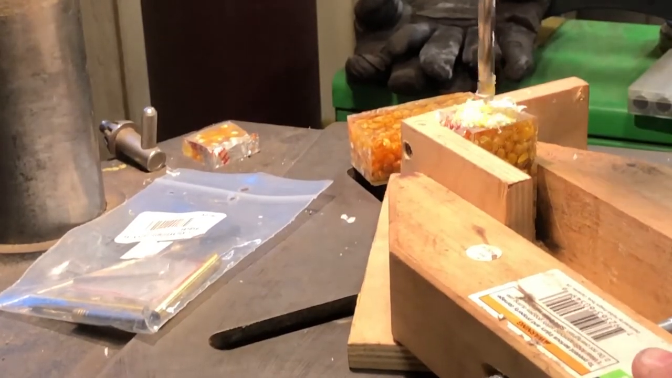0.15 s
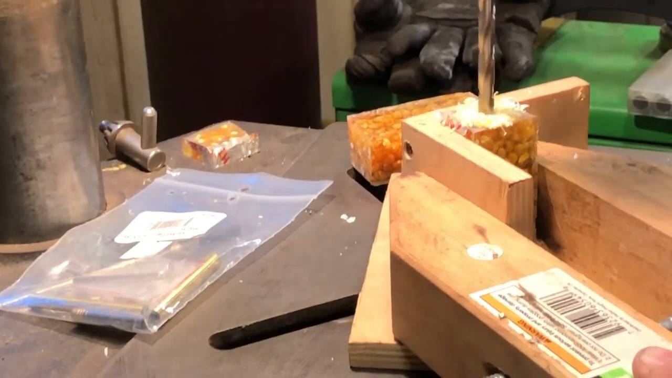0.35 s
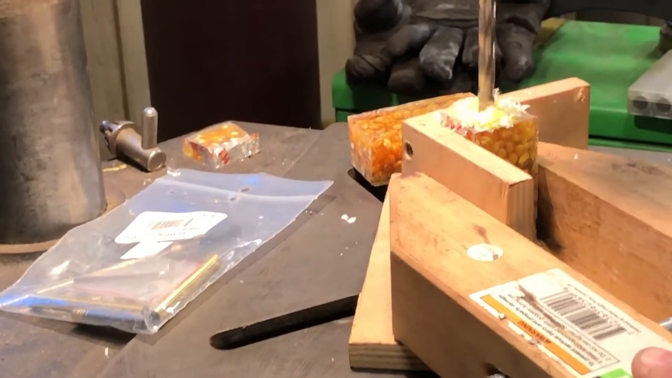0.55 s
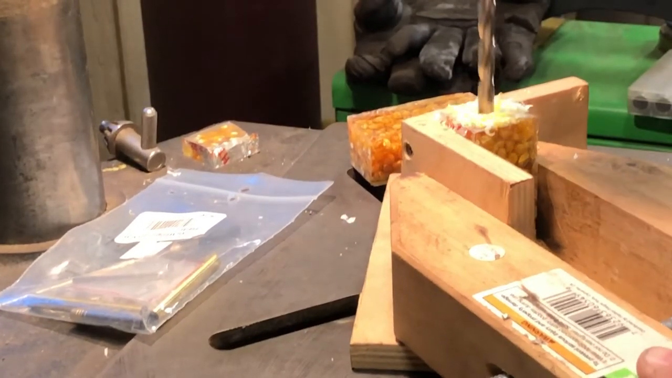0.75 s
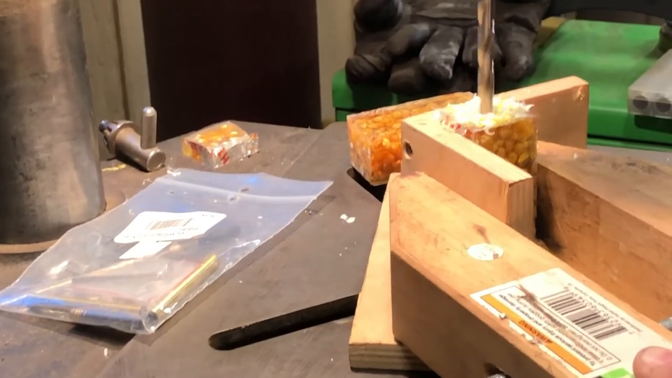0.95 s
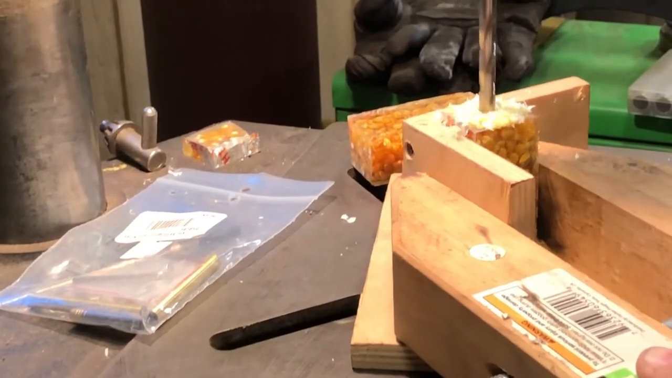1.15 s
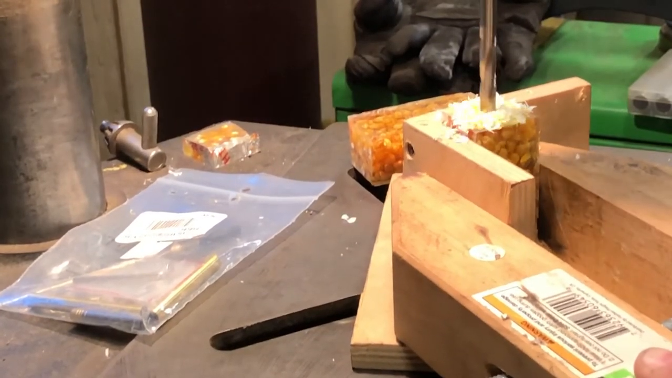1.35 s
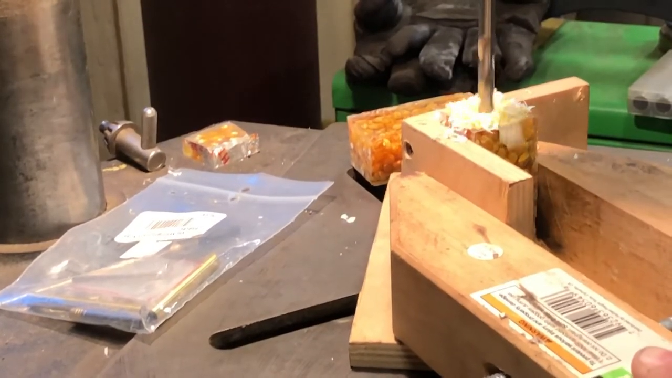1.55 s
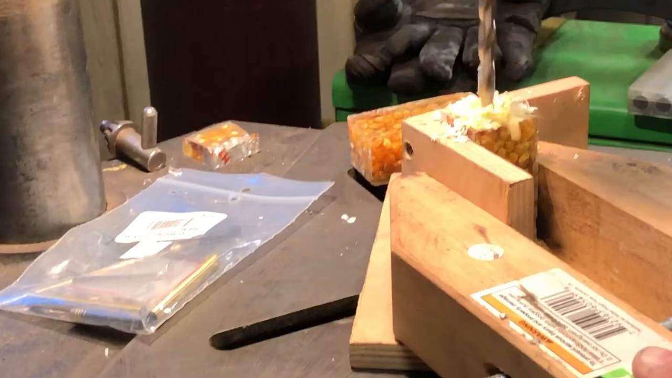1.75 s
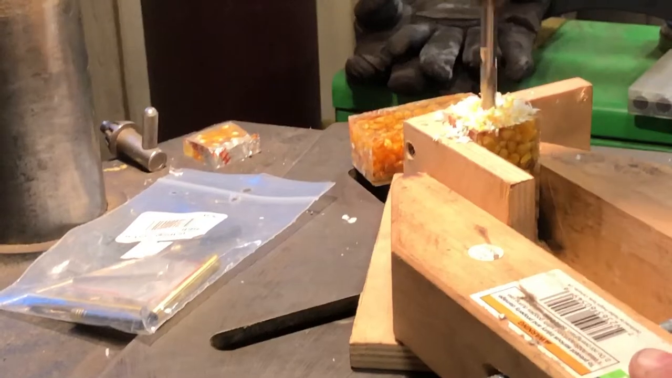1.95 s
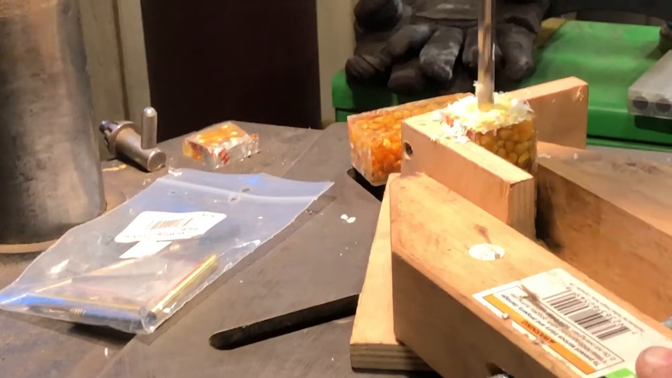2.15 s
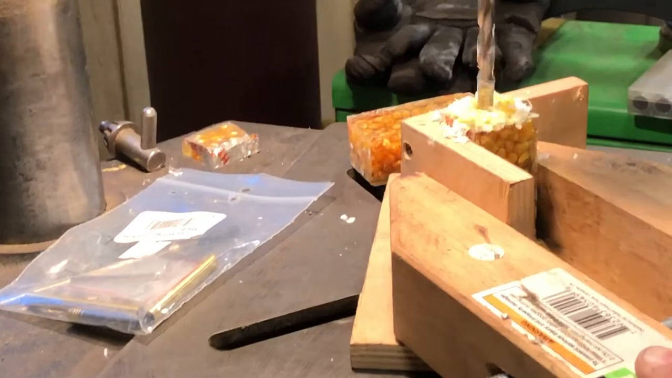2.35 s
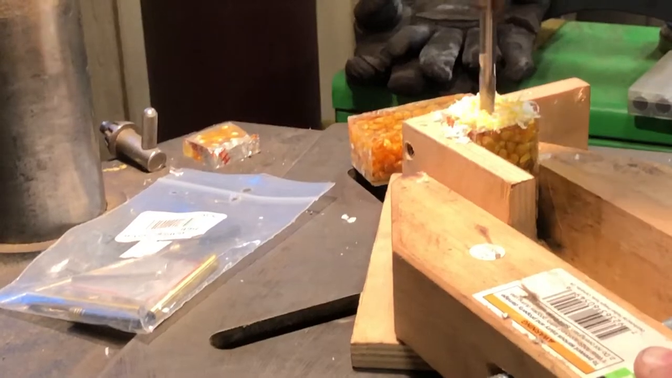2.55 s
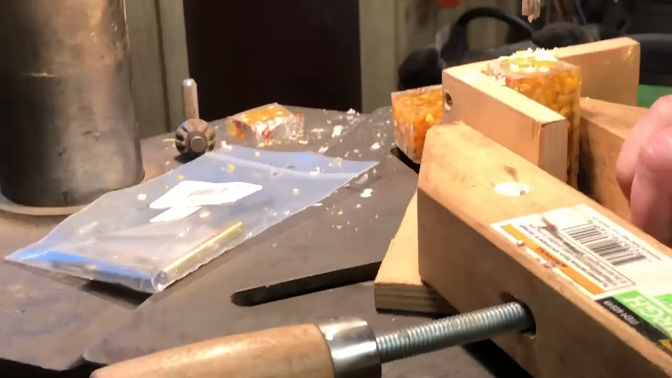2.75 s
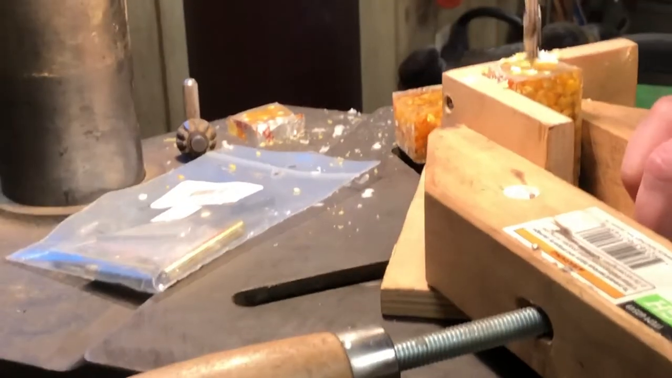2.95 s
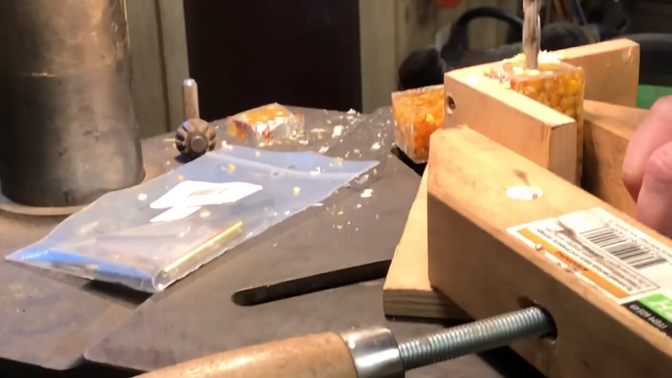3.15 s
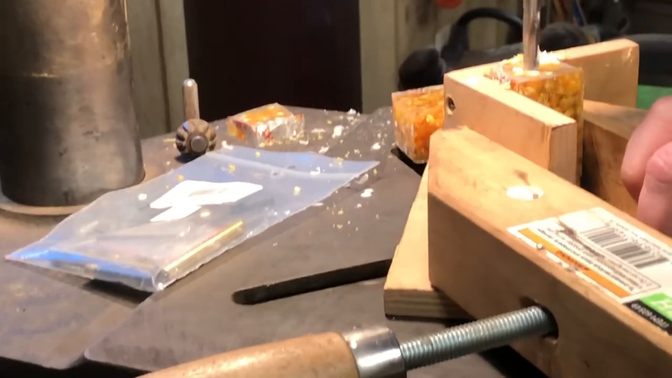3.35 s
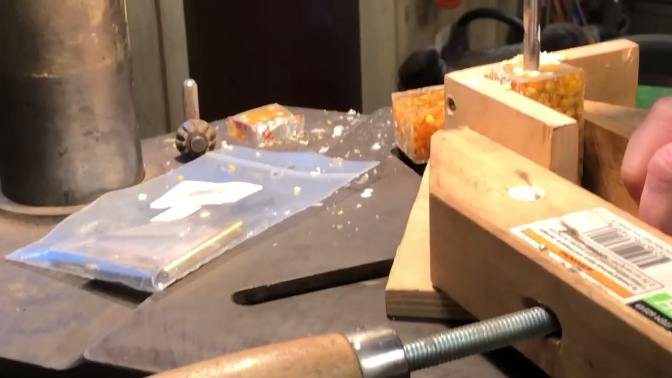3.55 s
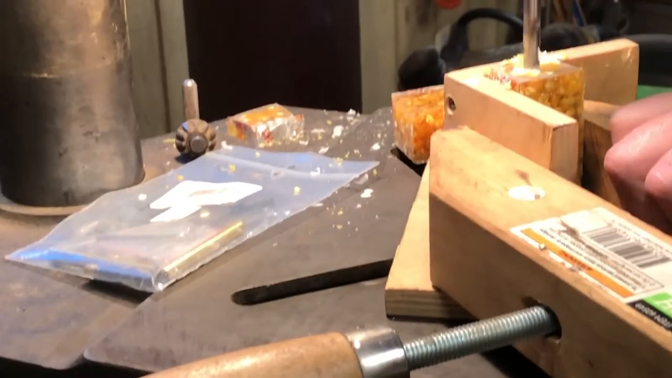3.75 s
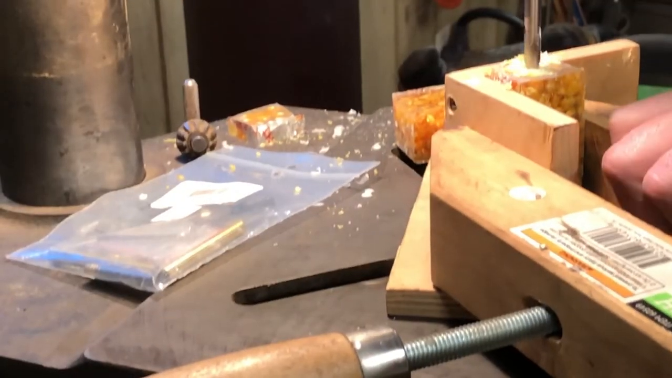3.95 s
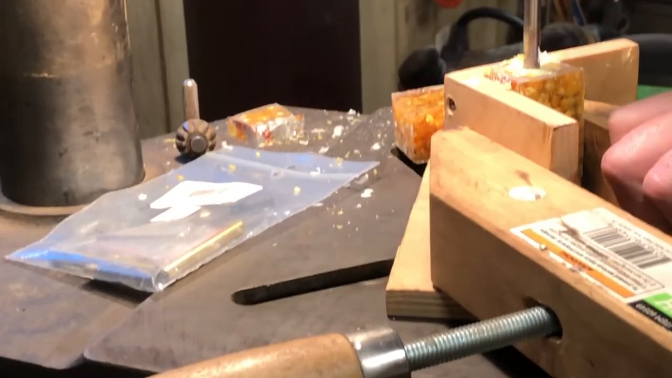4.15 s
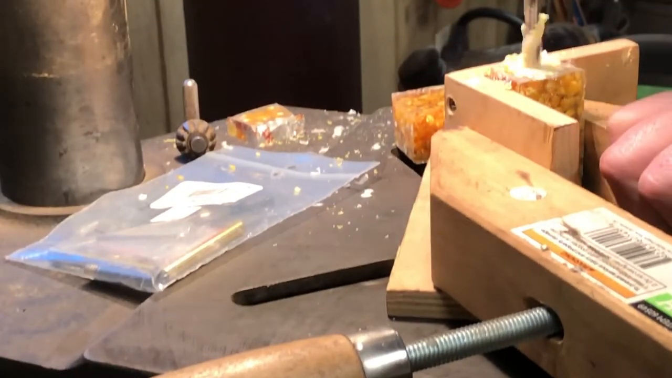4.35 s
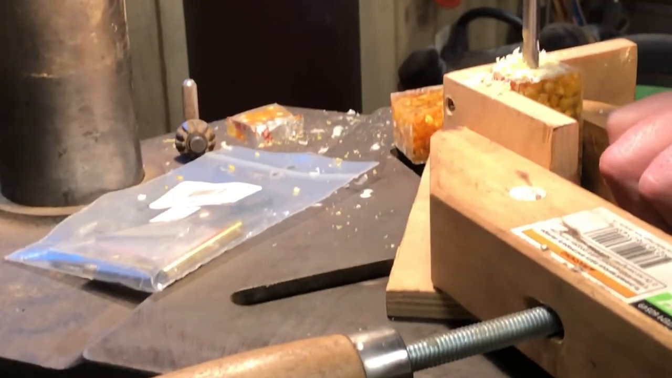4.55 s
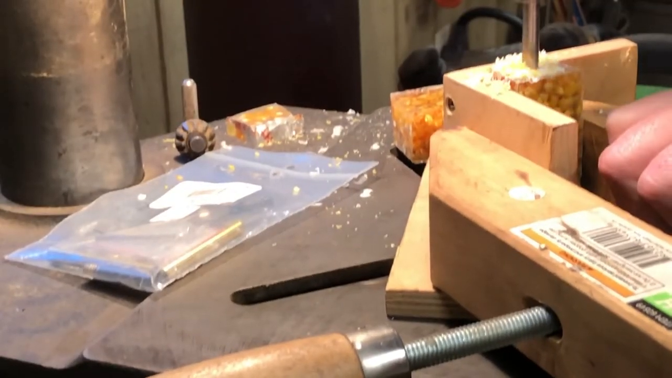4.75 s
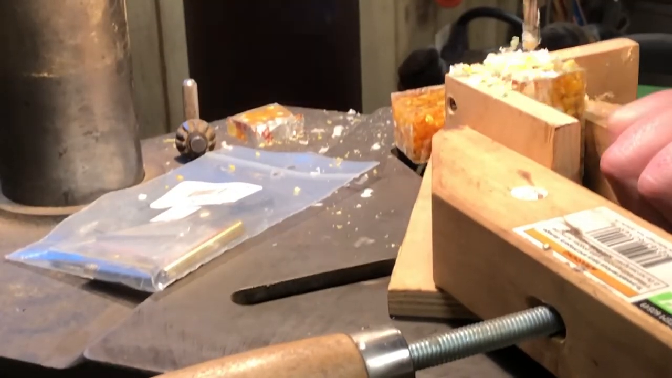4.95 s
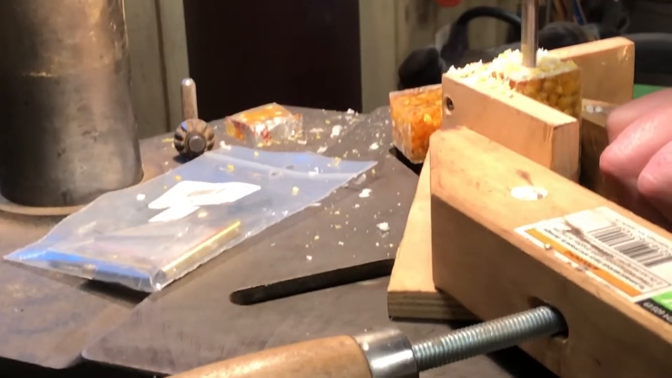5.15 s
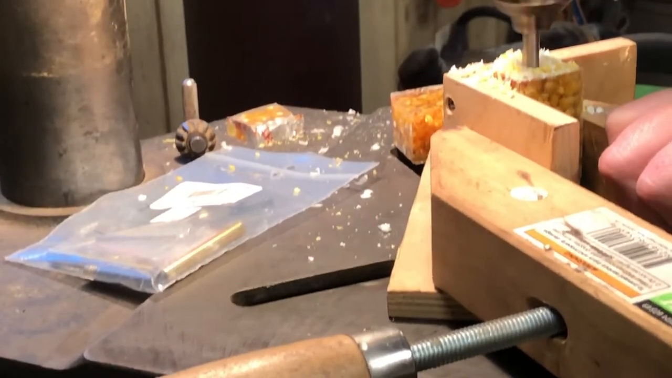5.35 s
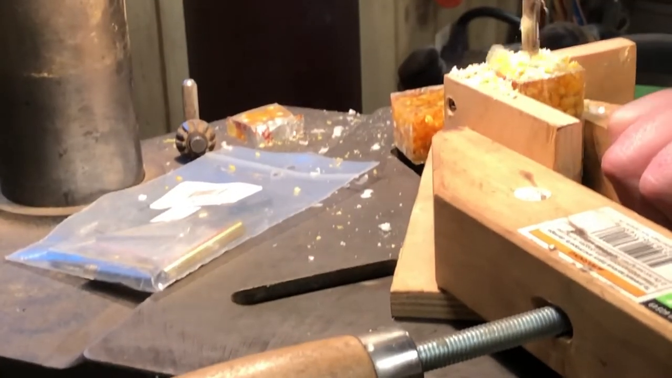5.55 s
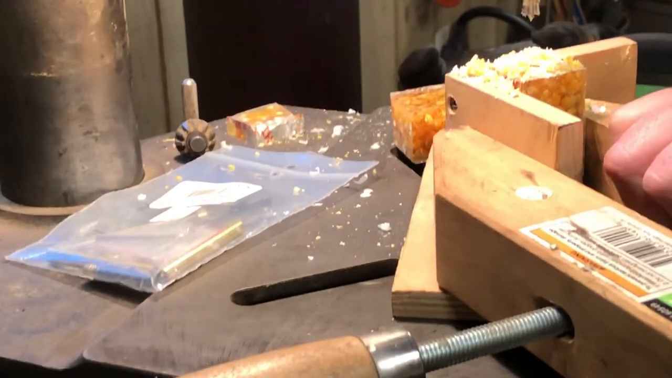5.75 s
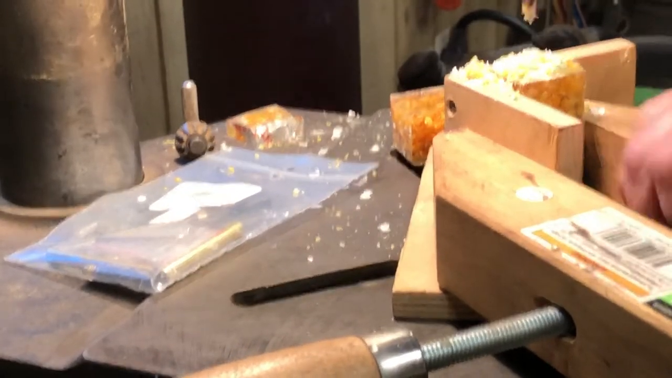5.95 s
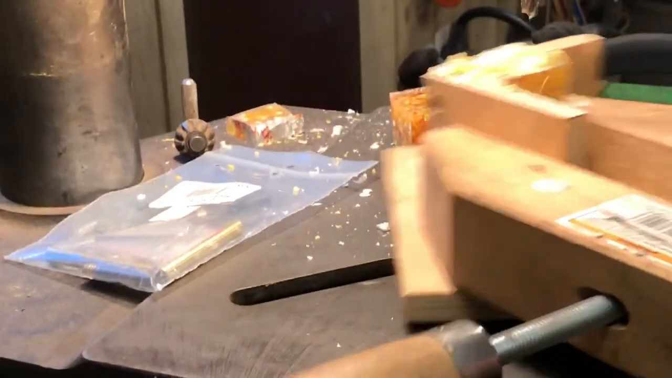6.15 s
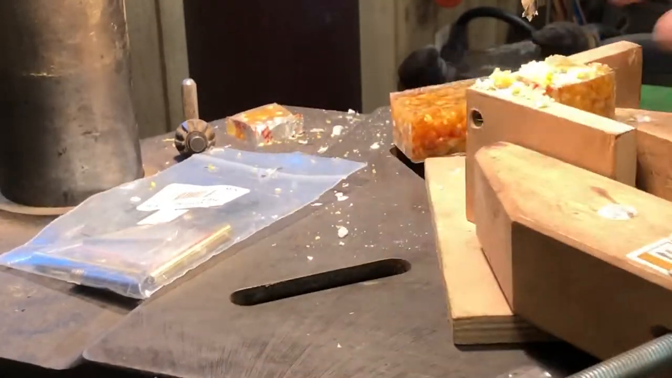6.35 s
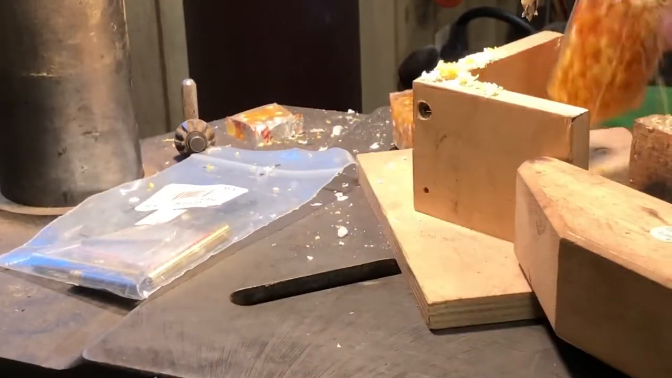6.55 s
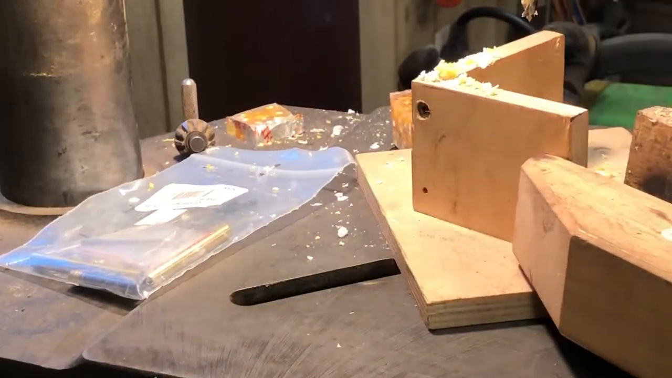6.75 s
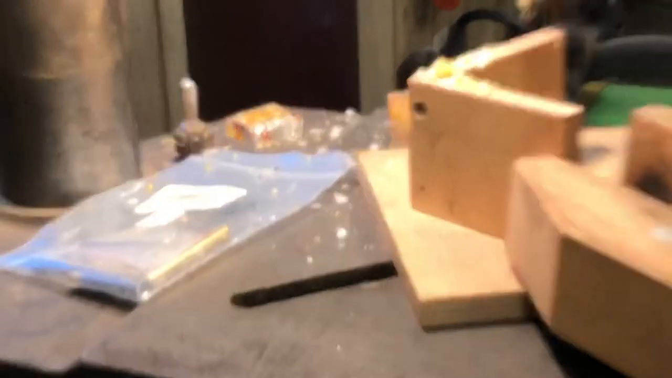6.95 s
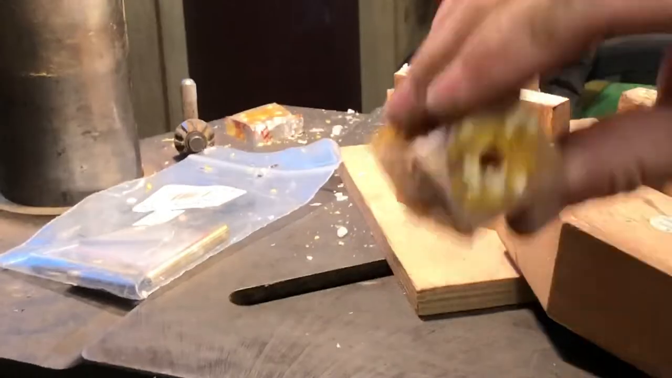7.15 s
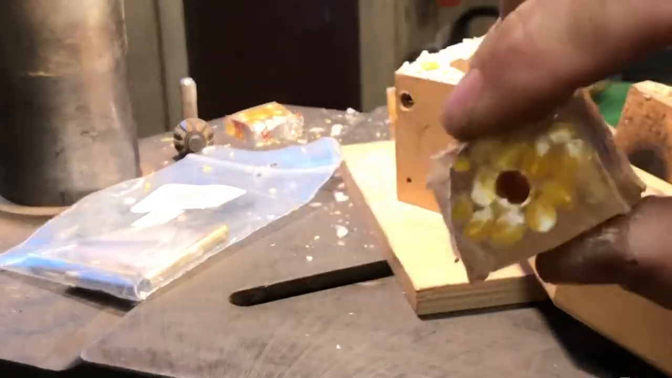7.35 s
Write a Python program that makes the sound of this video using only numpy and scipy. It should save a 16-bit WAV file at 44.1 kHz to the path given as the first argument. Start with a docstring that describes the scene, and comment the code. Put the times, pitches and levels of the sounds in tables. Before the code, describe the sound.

A drill press runs close by with a steady, slightly fluttering whine, a rattling frame and brittle scraping as it bores resin. Partway through, the perspective switches abruptly and the whine softens while crunches and snapping chips grow rougher. The machine cuts off with knocks and a thin metallic ping; then a very high chirp, three quick ticks and a cluster of wooden knocks sound in a small quiet workshop. Close microphone, identical in both ears.

```python
"""Drill press boring a resin blank

A drill press bores through a resin pen blank held in a wooden clamp, heard from two places in turn.
The motor whines as a sum of sine partials; belt, bearings, bit and chips are filtered noise.
The machine stops; the clamp is loosened with a gliding chirp and three ticks.
Clamp and blank knock on the table as bursts of noise through wood resonances, over room tone."""
import sys
import numpy as np
from scipy import signal
from scipy.fft import rfft, irfft, next_fast_len
from scipy.io import wavfile

SR = 44100
rng = np.random.default_rng(int(sys.argv[2]) if len(sys.argv) > 2 else 0)


def dump(signal):
    """Clip the signal to [-1, 1] and save it as 16-bit WAV at the path in sys.argv[1]."""
    limited = np.clip(np.atleast_2d(signal).T, -1, 1)
    pcm = np.round(limited * 32767).astype(np.int16)
    wavfile.write(sys.argv[1], SR, pcm)


N = 325899
T = np.arange(N) / SR
MOVE_S, STOP_S = 2.666, 5.845   # the listening place changes; the machine stops
WHINE_HZ = 720.1
# pairs: (first place, second place)
RATTLE_DB = (-45, -50)   # steady feed, before the output trim of the rattle
SCRAPE_DB = (-49.5, -53)   # steady scrape of the bit, before the swing of the bite


def amp(db):
    """Logarithmic level: decibels to amplitude gain."""
    return 10 ** (np.asarray(db) / 20)


def unit(x):
    """Normalisation of power: scale to rms 1."""
    return x / np.sqrt(np.mean(x ** 2) + 1e-20)


def in_time(rows):
    """Linear interpolation: each column of a curve, sample by sample."""
    s, *columns = np.transpose(rows)
    return [np.interp(T, s, c) for c in columns]


def by_place(levels_db):
    """Stepped gain: one value at each listening place."""
    return amp(np.where(T < MOVE_S, *levels_db))


def drift(rate_hz):
    """Low-passed noise: slow random variation of rms 1, computed at every 40th sample."""
    pole = np.exp(-80 * np.pi * rate_hz / SR)
    white = rng.standard_normal(N // 40 + 2002)
    slow = signal.lfilter([1], [1, -2 * pole, pole * pole], white)[2000:]
    return np.interp(np.arange(N) / 40, np.arange(len(slow)), unit(slow))


def coloured(x, colour, resonances=()):
    """Minimum-phase filtering: a broad colour and resonant humps, made causal through the cepstrum."""
    size = next_fast_len(N // 2 + SR // 2) * 2
    hz = np.arange(size // 2 + 1) * SR / size + 1
    points = np.array(colour)
    db = np.interp(np.log(hz), np.log(points[:, 0]), points[:, 1])
    # roll off below the lowest point of the colour
    db -= 20 * np.log10(1 + (points[0, 0] / 2 / hz) ** 2)
    for centre, width, lift in resonances:
        db += lift / (1 + (2 * (hz - centre) / width) ** 2)
    # doubling the causal half of the cepstrum gives the minimum phase
    cepstrum = irfft(np.log(amp(db)))[:size // 2]
    cepstrum[1:] *= 2
    return irfft(rfft(x, size) * np.exp(rfft(cepstrum, size)))[:N]


def band(x, low_hz, high_hz):
    """Band limitation: a Butterworth band-pass, second order on each side."""
    edges = [low_hz, min(high_hz, .48 * SR)]
    return signal.sosfilt(signal.butter(2, edges, "band", fs=SR, output="sos"), x)


def add(out, s, sound):
    """Superposition: mix a sound in at a time."""
    i = round(s * SR)
    out[i:i + len(sound)] += sound[:N - i]


def burst(t60, crack_db, crack_t60, tail_db, tail_t60):
    """Exponential decay of noise: a contact's ring, sharp crack and faint room tail (t60 in s)."""
    t = T[:SR // 3]
    ring = amp(-60 * t / t60)
    crack = amp(crack_db - 60 * t / crack_t60)
    tail = amp(tail_db - 60 * t / tail_t60)
    return (ring + crack + tail) * rng.standard_normal(len(t))


def swells(rows):
    """Addition of powers: bell-shaped swells given as (middle s, length s, dB)."""
    return sum(amp(2 * db) * np.exp(-np.minimum((2 * (T - s) / length) ** 2, 100))
               for s, length, db in rows)


def partial(phase, flutter_db):
    """Random modulation: a sine of rms 1 whose level and phase flutter slowly."""
    sway = .05 * flutter_db * drift(30)
    tone = np.sin(phase + rng.uniform(0, 2 * np.pi) + sway)
    return unit(tone * amp(flutter_db * drift(29)))


# level of the motor whine: t/s, level/dB
WHINE_LEVEL = [(0.0, -34.5), (0.11, -34), (0.82, -34), (0.87, -36), (1.0, -33.5), (1.57, -38), (1.63, -34),
               (1.86, -34.5), (1.89, -38.5), (2.24, -33.5), (2.84, -39.5), (3.21, -41), (3.26, -37),
               (4.7, -37), (5.61, -36.5), (5.67, -41.5), (5.8, -41.5)]
# overtones at the first place: multiple of the whine, level before the load gain/dB
OVERTONES_FIRST = [(.75, -68), (1.25, -59.5), (1.5, -56.5), (2, -53.5), (2.5, -65.5), (3, -56.5),
                   (3.75, -63), (4, -46), (4.75, -63), (5, -62), (6, -46.5), (6.5, -59), (7, -55.5),
                   (7.14, -63), (8.75, -66), (8.91, -61), (9, -65), (10.62, -68)]
# overtones at the second place: multiple of the whine, level before the shaft pulse/dB
OVERTONES_SECOND = [(1.25, -67.5), (1.5, -65), (3.999, -62.5), (4.97, -65), (5, -59.5), (6, -68)]
# low harmonics at the second place, the second fading and the third growing as the whine sags:
# multiple, base level/dB, change with whine/(dB per dB), change with crunch/(dB per dB)
LOW_HARMONICS = [(2, -53.5, 1.6, 0.17), (3, -58.5, -1.8, 1.06)]
WHISTLE_HZ, WHISTLE_DB = 8597, (-58.5, -57)   # thin high whistle: (first place, second place)
WHINE_SKIP_RAD = 0.34   # the whine skips in phase where the place changes


def motor(first, bite_db, feed_db):
    """Harmonic series: a strong whine with overtones and side tones that vary with load."""
    wander = .0005 * drift(3) + .0005 * drift(40)
    phase = 2 * np.pi * np.cumsum(WHINE_HZ * (1 + wander)) / SR + WHINE_SKIP_RAD * (T > MOVE_S)
    whine_db, = in_time(WHINE_LEVEL)
    whine = amp(whine_db) * partial(phase, flutter_db=0.68)

    # the highest overtones swell on every fourth cycle
    throb = 1 + .55 * np.cos(phase / 4)
    near = np.zeros(N)
    for k, db in OVERTONES_FIRST:
        near += amp(db) * partial(k * phase, flutter_db=1.3) * (throb if k > 5.5 else 1)
    near *= amp(1.23 * bite_db - 0.73)

    # the shaft turns once in 24 cycles of the whine, and the overtones pulse with it
    turn = phase / 24
    pulsing = unit(amp(5 * np.cos(turn) + 2.5 * np.cos(2 * turn)))
    far = pulsing * sum(amp(db) * partial(k * phase, flutter_db=2.5) for k, db in OVERTONES_SECOND)
    swing_db = whine_db - whine_db[(T > MOVE_S) & (T < STOP_S)].mean()
    crunch_db = feed_db - RATTLE_DB[1]
    for k, db, with_whine, with_crunch in LOW_HARMONICS:
        level_db = db + with_whine * swing_db + with_crunch * crunch_db
        far += amp(level_db) * partial(round(k) * phase, flutter_db=1.5)

    whistle = partial(2 * np.pi * WHISTLE_HZ * T + .9 * drift(10), flutter_db=1.5)
    return whine + first * near + (1 - first) * far + by_place(WHISTLE_DB) * whistle


# how hard the bit bites, used before the move as swing about its mean: t/s, level/dB
BITE_LEVEL = [(0.0, -46), (0.54, -45.5), (1.52, -47.5), (1.58, -67), (1.62, -45), (1.8, -43.5), (1.93, -50),
              (2.31, -43), (2.64, -49)]
# the bit grabs and crunches: middle t/s, length/s, rattle feed level/dB, scrape level/dB
BIT_CRUNCHES = [(0.274, 0.062, -46, -55), (.73, 0.1, -47, -61), (2.225, 0.11, -48, -57),
                (2.387, .06, -44.5, -54), (3.193, 0.2, -50.5, -62), (3.844, 0.043, -47, -56),
                (3.945, .05, -50.5, -52), (4.343, 0.074, -42.5, -48.5), (4.514, 0.074, -46, -44.5),
                (4.666, .08, -59, -51), (4.932, 0.094, -42, -52), (5.117, 0.033, -45, -42),
                (5.156, 0.068, -47, -43), (5.3, 0.046, -56, -44.5), (5.48, 0.094, -46.5, -54),
                (5.555, 0.088, -42, -48.5)]
SCRAPE_FOLLOWS = 0.68   # share of the bite's swing


def load():
    """Incoherent summation: bite, rattle feed and scrape in dB, a steady feed with crunches on top."""
    bite_db, = in_time(BITE_LEVEL)
    bite_db = (bite_db - bite_db[T < MOVE_S].mean()) * (T < MOVE_S)
    rattle_swells = swells([(s, length, db) for s, length, db, _ in BIT_CRUNCHES])
    scrape_swells = swells([(s, length, db) for s, length, _, db in BIT_CRUNCHES])
    shaking = by_place(RATTLE_DB) ** 2 + rattle_swells
    scraping = (by_place(SCRAPE_DB) * amp(SCRAPE_FOLLOWS * bite_db)) ** 2 + scrape_swells
    return bite_db, 10 * np.log10(shaking), 10 * np.log10(scraping)


# the rattle swells on each turn of the belt
BELT_TURN_S, BELT_PEAK_S, BELT_SWING_DB = .126, 1.071, 0.4


def rattle(feed_db, colour, resonances, throb_db):
    """Forced vibration: belt and bearings shake the frame in throbs at a quarter of the whine."""
    # a harder feed at the second place makes the noise grainier
    crunch = np.clip((feed_db + 49.5) / 5, 0, 1) * (T > MOVE_S)
    grains = amp(2.5 * crunch * (drift(250) - .3))
    belt_db = BELT_SWING_DB * np.cos(2 * np.pi * (T - BELT_PEAK_S) / BELT_TURN_S)
    motor_db = throb_db * np.sin(np.pi / 2 * WHINE_HZ * T)
    shake = rng.standard_normal(N) * grains * amp(belt_db + motor_db + 0.64 * drift(30))
    sound = band(coloured(shake, colour, resonances), 320, 19700)
    # the level is referred to the band from 850 to 2000 Hz
    return amp(feed_db - 2.5) * sound / np.std(band(sound, 850, 2000))


# rattle colour at each place: f/Hz, relative level/dB
COLOUR_FIRST = [(400, -30.5), (650, -21.5), (1000, -15), (1500, -14), (2400, -16), (3400, -14), (3950, -18),
                (4800, -20), (5400, -22), (7000, -23), (9500, -25), (12500, -27), (15800, -38)]
COLOUR_SECOND = [(400, -20), (650, -25), (1000, -12), (1250, -6.5), (1700, -10.5), (2500, -9),
                 (3300, -13.5), (3850, -14), (4600, -13), (5200, -23), (5800, -16.5), (8300, -16),
                 (10800, -33), (15800, -21)]
# frame resonances at each place: f/Hz, width/Hz, lift/dB
RESONANCES_FIRST = [(394, 33, 3.5), (740, 77, 3.4), (1090, 97, 5.8), (1368, 58, 6.5), (2845, 75, 4.7),
                    (4130, 85, 9.5), (4304, 56, 10), (4474, 93, 12.6), (5130, 150, 9), (5580, 130, 4.8),
                    (6390, 160, 12.6), (7220, 120, 4.9), (7720, 150, 4.2), (11000, 250, 3.6),
                    (11750, 250, 3)]
RESONANCES_SECOND = [(701, 147, 27.8), (897, 54, 10.5), (1427, 94, 8.4), (1926, 570, 6.1), (3010, 630, 7.4),
                     (3620, 196, 10.1), (4300, 160, 8.8), (5900, 260, 4.2), (7340, 70, 1.3),
                     (9360, 83, 2.8), (11600, 250, 22), (13000, 210, 3.3)]
FRAME_FOLLOWS = 0.17   # share of the bite's swing


def frame(first, bite_db, feed_db):
    """Modal response: the rattle takes on other frame resonances at each listening place."""
    near = rattle(feed_db, COLOUR_FIRST, RESONANCES_FIRST, throb_db=0.4)
    far = rattle(feed_db, COLOUR_SECOND, RESONANCES_SECOND, throb_db=-1.2)
    return first * amp(FRAME_FOLLOWS * bite_db) * near + (1 - first) * far


# colour of the scrape: f/Hz, relative level/dB
SCRAPE_COLOUR = [(1500, -13), (4000, -2.5), (6500, 1.5), (9500, 1), (11000, -1.5), (15500, 0.5)]
# resonances of blank and bit that the chips ring with: f/Hz, width/Hz, lift/dB
BLANK_RESONANCES = [(4490, 520, 7.5), (6060, 320, 7.5), (6900, 260, 5.5), (9550, 390, 5.5), (13100, 416, 3),
                    (15000, 450, 3)]
# chips snapping: t/s, relative level/dB, ring t60/s
CHIP_SNAPS = [(.7333, -25, .05), (1.1514, -29, .03), (1.621, -24.5, 0.037), (2.209, -14.5, 0.03),
              (2.3648, -23.5, 0.033), (3.112, -27.5, .025), (3.377, -33, 0.048), (3.836, -23.5, 0.045),
              (3.9276, -26.5, 0.069), (4.5015, -25, .05), (4.5239, -20.5, 0.028), (4.9133, -24, .04),
              (4.961, -25, .05), (5.0508, -18, 0.03), (5.106, -29, .06), (5.1132, -18.5, 0.093),
              (5.308, -11.5, 0.0056)]
# crumbs crack off at random: rate, level against the grains at full grab, ring time
CRUMBS_PER_S, CRUMB_DB, CRUMB_T60_S = 45, -0.5, .012


def cutting(scrape_db):
    """Brittle fracture: dense tiny cracks under the bit's lips, with sparse crumbs and snapping chips."""
    fractures = (rng.random(N) < 4500 / SR) * rng.standard_normal(N)
    grains = unit(fractures * amp(1.7 * drift(140)))
    cracks = (rng.random(N) < CRUMBS_PER_S / SR) * rng.uniform(-1, 1, N)
    crumb = burst(CRUMB_T60_S, crack_db=0, crack_t60=.003, tail_db=-30, tail_t60=.06)
    crumbs = unit(signal.fftconvolve(cracks, crumb)[:N])
    grabbing = np.clip((scrape_db - SCRAPE_DB[1]) / 8, .2, 1) * np.where(T < MOVE_S, .6, 1)
    debris = grains + amp(CRUMB_DB) * grabbing * crumbs
    scrape = amp(scrape_db) * unit(coloured(debris, SCRAPE_COLOUR, BLANK_RESONANCES))

    snaps = np.zeros(N)
    for s, db, t60 in CHIP_SNAPS:
        snap = burst(t60, crack_db=-5.0, crack_t60=0.29 * t60, tail_db=-40, tail_t60=0.11)
        add(snaps, s, amp(db - 8.5) * snap)
    snap_colour = [(2000, -6.5), (5000, -7), (9500, 0), (12000, -6.0), (15500, -8)]
    return scrape + coloured(snaps, snap_colour, BLANK_RESONANCES)


# the screw slips with a chirp that drops in pitch, then rings out
CHIRP_S, CHIRP_DB = 6.184, -7
CHIRP_ATTACK_S, CHIRP_HOLD_S, CHIRP_T60_S = 0.003, 0.0083, .012
CHIRP_RING_DB, CHIRP_RING_T60_S = -10, .048
CHIRP_FROM_HZ, CHIRP_TO_HZ, CHIRP_GLIDE_S = 15000, 14400, .006


def chirp():
    """Stick-slip friction: a shrill falling tone over noise, held briefly, then ringing out."""
    t = np.clip(T - CHIRP_S, 0, 1)
    hz = CHIRP_TO_HZ + (CHIRP_FROM_HZ - CHIRP_TO_HZ) * np.exp(-(t / CHIRP_GLIDE_S) ** 2)
    jitter = 1 + 0.013 * drift(399.5)
    tone = np.sin(2 * np.pi * np.cumsum(hz * jitter) / SR)
    friction = amp(-35) * unit(band(rng.standard_normal(N), 6500, 14000))
    attack = np.minimum(t / CHIRP_ATTACK_S, 1) ** 2
    # a fast fall gives way to a slower ring
    released = np.maximum(t - CHIRP_HOLD_S, 0)
    ring_db = CHIRP_RING_DB - 60 * released / CHIRP_RING_T60_S
    fall_db = np.maximum(-60 * released / CHIRP_T60_S, ring_db)
    return attack * amp(CHIRP_DB + fall_db) * (tone + friction)


# ticks of the clamp: t/s, relative level/dB
CLAMP_TICKS = [(6.614, -13.5), (6.6528, -12), (6.69, -13.5)]
# colour of the ticks' wood ring: f/Hz, relative level/dB
CLAMP_TICK_COLOUR = [(350, -7.5), (700, -7), (1600, 1), (3600, -0.5), (5500, -2.5), (7000, -10), (8400, 0),
                     (10700, -17), (13000, -10), (15500, -7)]
# resonances that the ticks ring with: f/Hz, width/Hz, lift/dB
TICK_RESONANCES = [(700, 94, 11), (1130, 110, 11), (1640, 220, 8.5), (2630, 180, 3), (3560, 220, 5.5)]


def ticks(snap_hz=8400, snap_s=0.00014, snap_db=2.5):
    """Impulse response: one contact slips three times, a tiny bright snap and a much alike wood ring."""
    wood, snaps, t = np.zeros(N), np.zeros(N), T[:SR // 100]
    shared = burst(t60=.055, crack_db=4.0, crack_t60=0.0077, tail_db=-36, tail_t60=0.13)
    snap = (t / snap_s) ** 2 * np.exp(-t / snap_s) * np.sin(2 * np.pi * snap_hz * t)
    for s, db in CLAMP_TICKS:
        own = burst(t60=0.056, crack_db=0, crack_t60=.006, tail_db=-38, tail_t60=.15)
        add(wood, s, amp(db - 18.0) * (0.91 * shared + .5 * own))
        add(snaps, s, amp(db + snap_db) * snap)
    return band(coloured(wood, CLAMP_TICK_COLOUR, TICK_RESONANCES), 380, 20000) + snaps


# wood knocks: t/s, relative level/dB, strongest f/Hz, fall away from it/(dB per octave squared)
WOOD_KNOCKS = [(2.916, -35, 1490, 3.5), (5.057, -37, 3300, 1.2), (5.8272, -33.5, 8000, 2.7),
               (5.92, -35.5, 2250, 4), (5.9344, -26.5, 12000, 0.65), (6.166, -41.5, 15000, 1.4),
               (6.206, -48, 5000, 0.8), (6.243, -42, 5200, 2.5), (6.9524, -37, 1150, 6),
               (6.961, -28, 4100, 2.5), (6.986, -30.5, 2700, 6), (6.988, -32, 1010, 3.5),
               (7.034, -53, 1900, 3), (7.062, -55, 400, 0), (7.084, -42, 1300, 1.6), (7.174, -61, 900, 2),
               (7.314, -66, 1000, 1.3), (7.347, -64, 500, 2)]
# bands of a knock: low f/Hz, high f/Hz, ring t60/s
RING_BANDS = [(268, 690, 0.084), (830, 2270, 0.066), (2140, 4660, 0.048), (5000, 10500, 0.037),
              (10340, 15000, 0.035)]
# resonances of the wooden clamp: f/Hz, width/Hz, lift/dB
CLAMP_RESONANCES = [(378, 58, 10.5), (675, 51, 10.5), (1160, 140, 3), (1900, 400, 5.5), (2520, 200, 3),
                    (3280, 140, 6), (3990, 200, 3.5), (5200, 200, 6), (5880, 170, 5.5), (7050, 800, -1),
                    (9630, 730, 2), (12700, 900, -1)]
# the screw handle pings once
PING_S, PING_HZ, PING_DB, PING_T60_S = 5.935, 11360, -29, .065


def knocks():
    """Frequency-dependent damping: clamp and blank knock on the table, and the lows ring longest."""
    out, t = np.zeros(N), T[:SR // 3]
    for s, db, strongest_hz, fall_db in WOOD_KNOCKS:
        for low, high, t60 in RING_BANDS:
            octaves = np.log2(np.sqrt(low * high) / strongest_hz)
            contact = burst(t60, crack_db=-2.5, crack_t60=0.0092, tail_db=-26.5, tail_t60=0.22)
            ring = band(contact, low, high)
            # the level is that of the first 8 ms
            add(out, s, amp(db - fall_db * octaves ** 2) * ring / np.std(ring[:SR // 125]))
    knock_colour = [(230, -10), (340, -4.5), (1000, 0.5), (4000, -5.0), (15000, -1.5)]
    out = coloured(out, knock_colour, CLAMP_RESONANCES)
    add(out, PING_S, amp(PING_DB - 60 * t / PING_T60_S) * np.sin(2 * np.pi * PING_HZ * t))
    return out


# wood slides on wood: middle t/s, length/s, level/dB
WOOD_SLIDES = [(6.307, 0.035, -52), (6.442, 0.029, -48.5), (7.035, 0.03, -54)]
# wood drags on the table, low and dull: middle t/s, length/s, level/dB
TABLE_DRAGS = [(6.0, 0.023, -53.5), (6.07, .08, -62.5)]
# faint squeaks: start t/s, end t/s, start f/Hz, end f/Hz, level of the fundamental/dB
FAINT_SQUEAKS = [(1.987, 2.01, 2100, 2030, -38), (6.775, 6.88, 1580, 1670, -74),
                 (6.861, 6.973, 1240, 1334, -64.5), (7.215, 7.383, 1325, 1415, -70)]


def handling():
    """Sliding friction: slides and drags as swelling noise, squeaks as gliding harmonic tones."""
    grit = rng.standard_normal(N) * amp(3.0 * drift(310))
    slide_colour = [(700, -6), (1800, 4), (5000, -8), (9000, 0), (15000, -7)]
    out = np.sqrt(swells(WOOD_SLIDES)) * unit(coloured(grit, slide_colour, BLANK_RESONANCES))
    out += np.sqrt(swells(TABLE_DRAGS)) * unit(band(rng.standard_normal(N), 290, 460))
    for start, end, start_hz, end_hz, level_db in FAINT_SQUEAKS:
        along = np.linspace(0, 1, int(max(end - start, .01) * SR))
        phase = 2 * np.pi * np.cumsum(start_hz + (end_hz - start_hz) * along) / SR
        tone = np.sin(phase) + .7 * np.sin(2 * phase) + .45 * np.sin(3 * phase)
        add(out, start, amp(level_db) * np.sin(np.pi * along) * tone)
    return out


# colour of the cooling fan: f/Hz, relative level/dB
FAN_COLOUR = [(20, -23), (135, -35), (175, -10), (220, -18.5), (280, 1.5), (380, 4), (510, -10), (580, -9),
              (800, -16), (2000, -29)]
FAN_DB = (-65.5, -69)   # (first place, second place)


def cooling_fan():
    """Broadband flow noise: steady coloured noise at one level for each place."""
    return by_place(FAN_DB) * unit(coloured(rng.standard_normal(N), FAN_COLOUR))


# colour of room tone and wash: f/Hz, relative level/dB
ROOM_COLOUR = [(30, -29), (130, -34.5), (200, -22.5), (290, -7.5), (370, -3), (520, -12), (800, -6.5),
               (1600, -9.5), (2700, -15), (4200, -18), (9000, -22), (15800, -26.5)]
ROOM_DB = -67
WASH_DB = (-56, -60)   # wash of the running machine in the room: (first place, second place)
COAST_DB, COAST_T60_S = -52, 2.1   # the wash dies away as the machine coasts


def room():
    """Diffuse field: room tone and the machine's wash add in power; the wash decays after the stop."""
    coast = amp(COAST_DB - 60 * np.maximum(T - STOP_S, 0) / COAST_T60_S)
    wash = np.where(T < STOP_S, by_place(WASH_DB), coast)
    return np.hypot(amp(ROOM_DB), wash) * unit(coloured(rng.standard_normal(N), ROOM_COLOUR))


def scene():
    """Linear superposition: machine, cut, handling and room tone, alike in both ears."""
    first = np.clip((MOVE_S - T) / 0.0045, 0, 1)
    running = np.clip((STOP_S - T) / .03 + .5, 0, 1)
    bite_db, feed_db, scrape_db = load()
    machine = motor(first, bite_db, feed_db) + frame(first, bite_db, feed_db)
    machine += cutting(scrape_db) + cooling_fan()
    mono = running * machine + chirp() + ticks() + knocks() + handling() + room()
    return np.array([mono, mono])


def record(dry):
    """Band limitation: an elliptic low-pass cuts the top steeply at 15820 Hz."""
    return signal.sosfilt(signal.ellip(12, .2, 80, 15820, fs=SR, output="sos"), dry)


dry = scene()
out = record(dry)
dump(out)
```